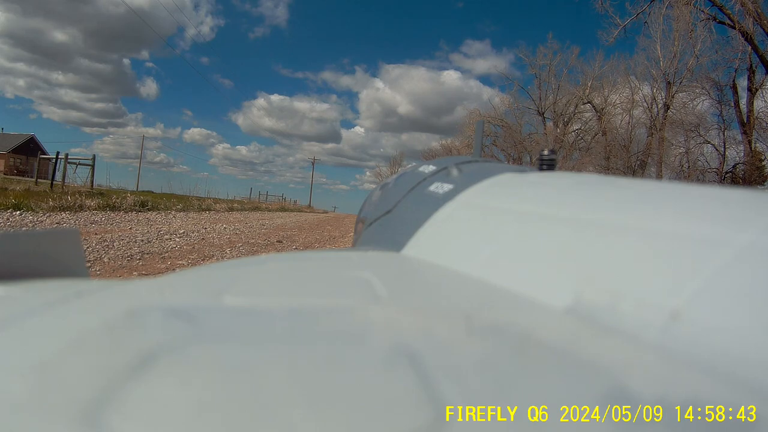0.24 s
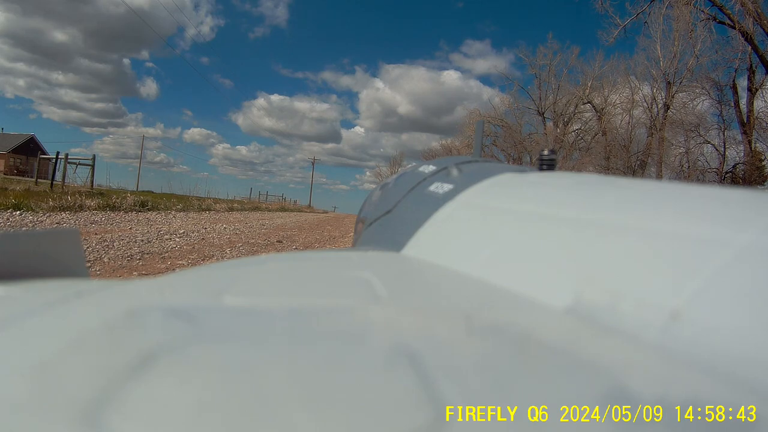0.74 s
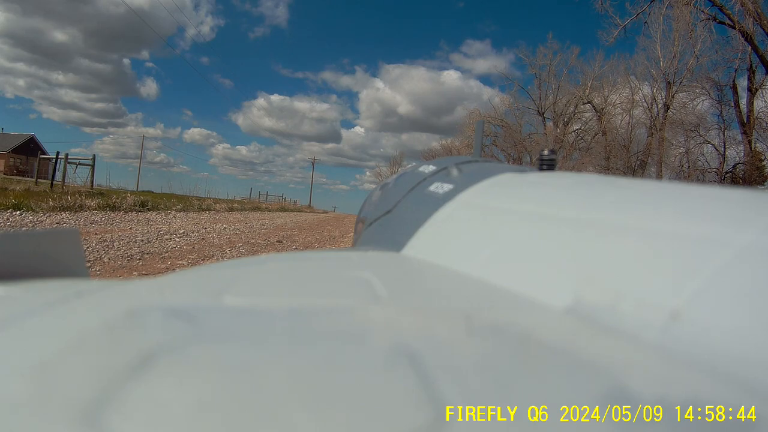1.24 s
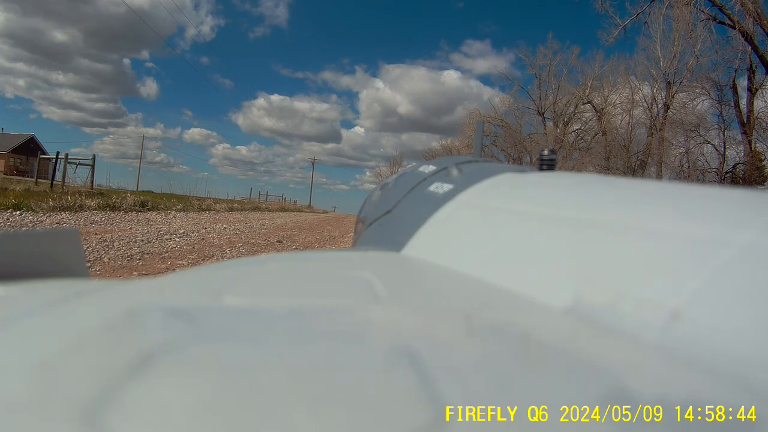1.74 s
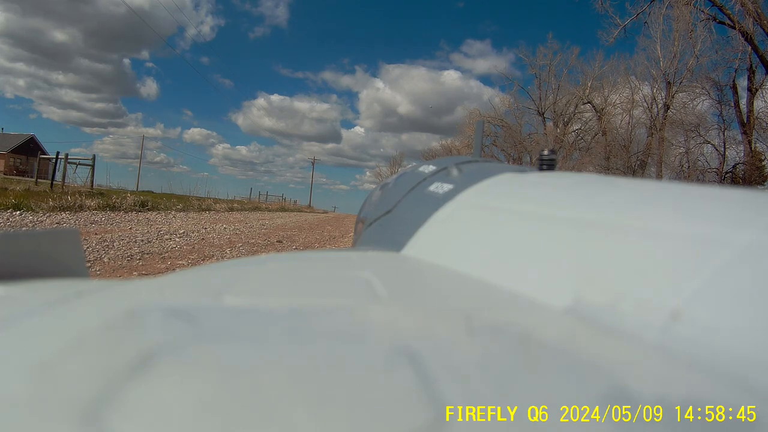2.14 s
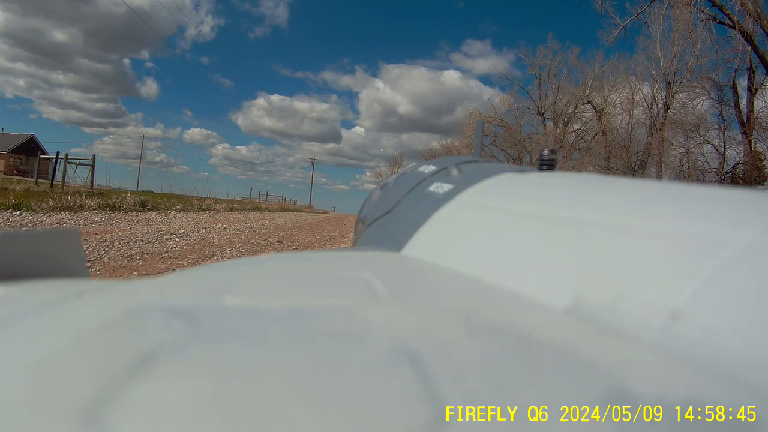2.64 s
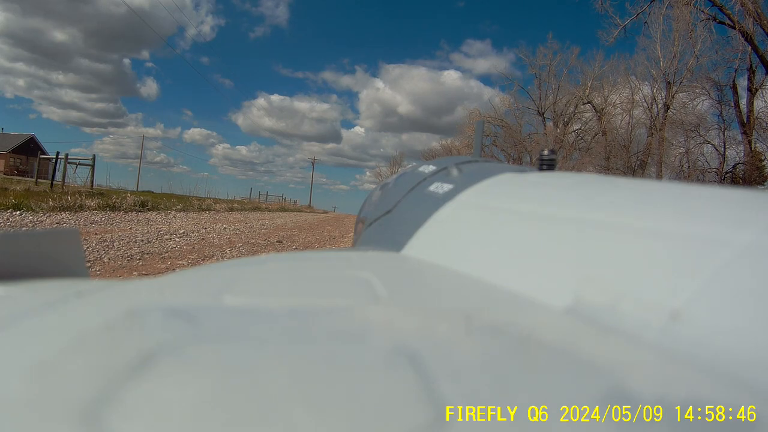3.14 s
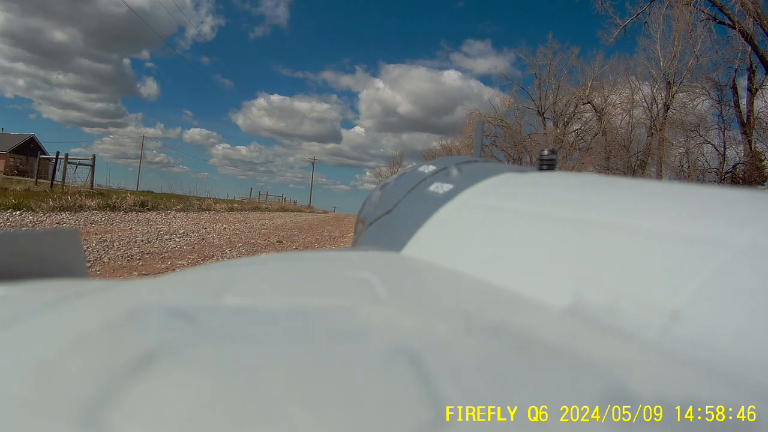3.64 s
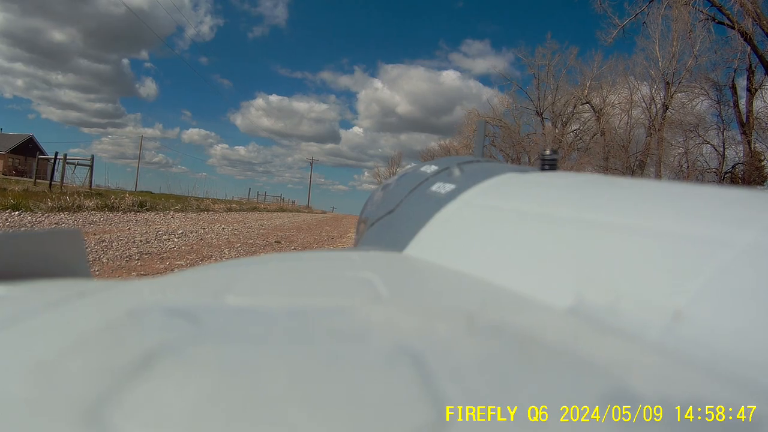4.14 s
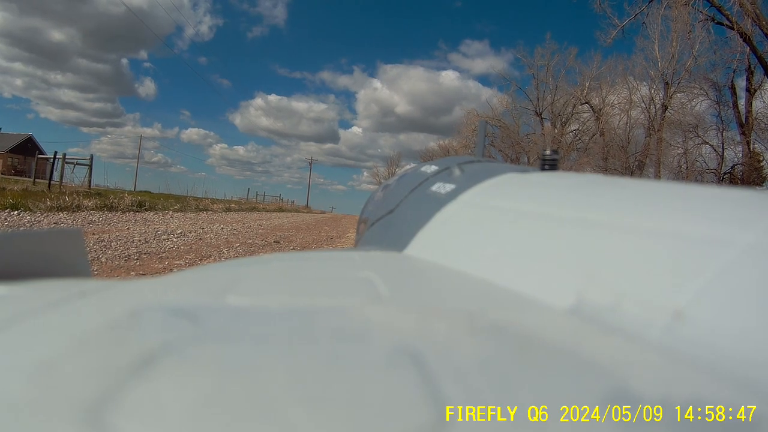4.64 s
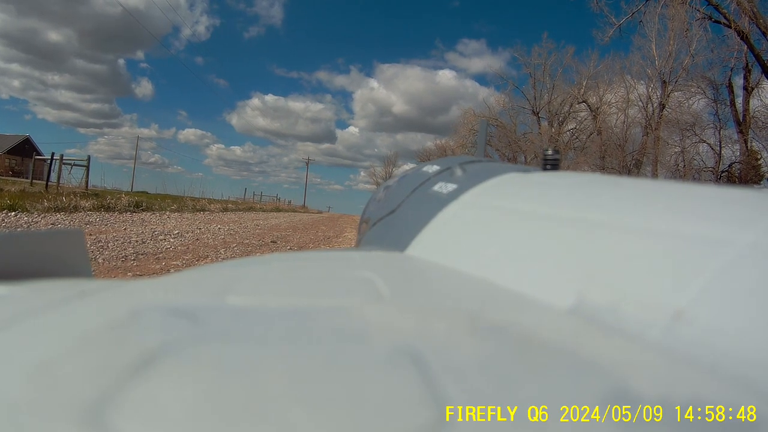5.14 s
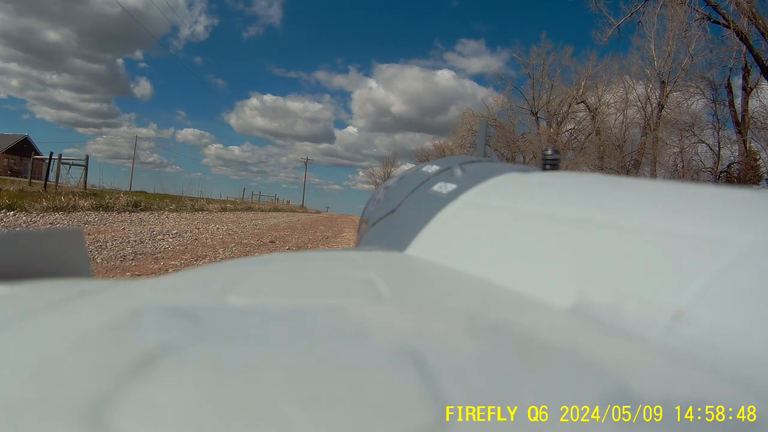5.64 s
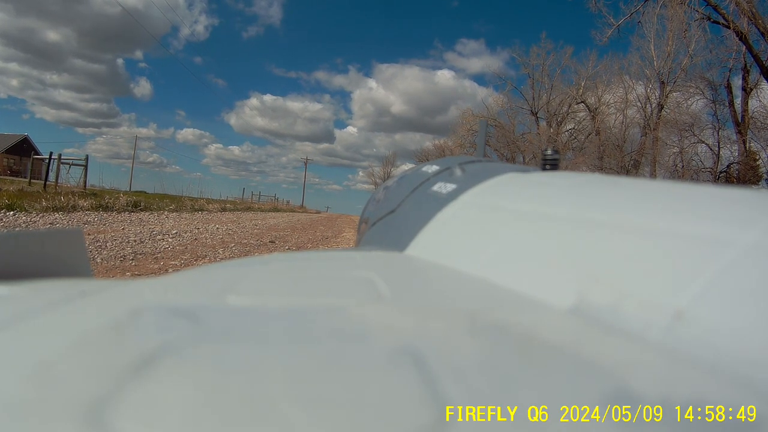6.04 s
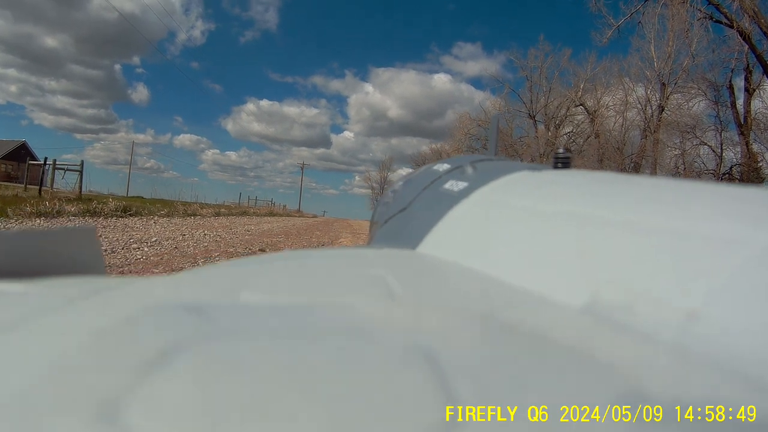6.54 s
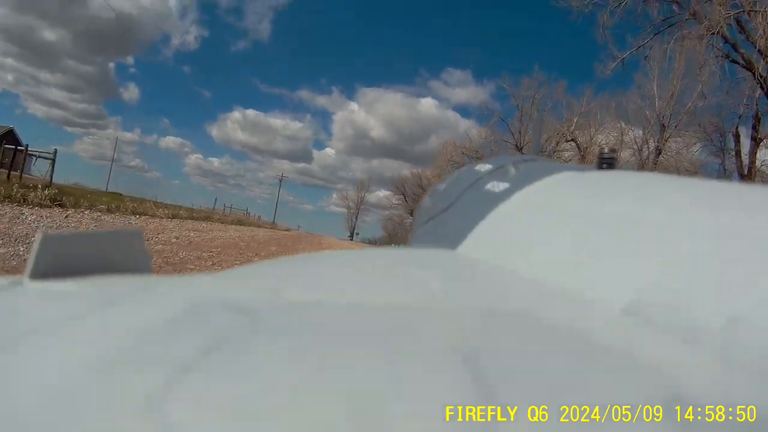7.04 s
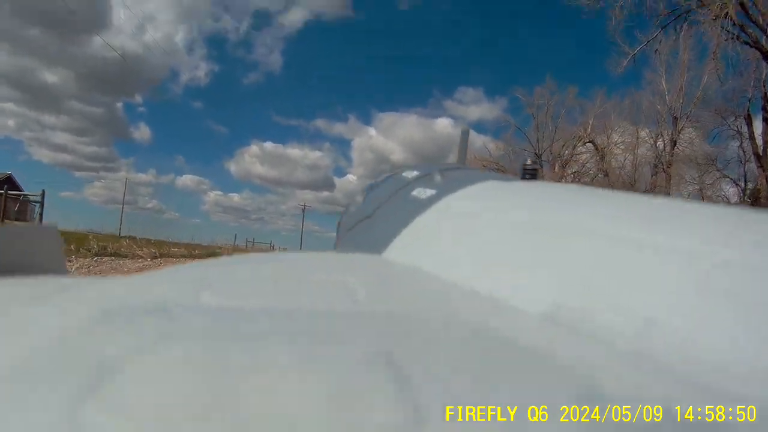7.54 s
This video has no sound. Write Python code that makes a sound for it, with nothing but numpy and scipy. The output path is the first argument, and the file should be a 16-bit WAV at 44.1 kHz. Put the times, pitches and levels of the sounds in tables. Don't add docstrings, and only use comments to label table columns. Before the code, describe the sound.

Distant birds chirp and trill, tiny gears twitch, and a model jet's electric fan jerks awake, idles, surges loudly, then rolls bumping across stones.

```python
import sys
import numpy as np
from scipy import signal
from scipy.fft import rfft, irfft, next_fast_len
from scipy.io import wavfile
from scipy.ndimage import uniform_filter1d, map_coordinates

SR = 44100
rng = np.random.default_rng(int(sys.argv[2]) if len(sys.argv) > 2 else 0)


def natural_amplitude(level_db):
    exponent = np.asarray(level_db, float) / 20
    return 10 ** exponent


def persist_wave(psi):
    counts = np.round(np.clip(psi, -1, 1) * 32767).astype(np.int16)
    wavfile.write(sys.argv[1], SR, np.atleast_2d(counts).T)


N = 343980
SPIN_S = 4.495


def unit(x):
    return x / np.sqrt(np.mean(x ** 2) + 1e-20)


def curves(rows):
    s, *cols = np.transpose(rows)
    return [np.interp(np.arange(N) / SR, s, c) for c in cols]


def law(points, hz):
    f, db = np.transpose(points)
    return np.interp(np.log(hz + 1), np.log(f + 1), db)


def after(s, rise=1e-4):
    return np.clip((np.arange(N) / SR - s) / rise, 0, 1)


def wobble(rate):
    knots = rng.standard_normal(int(N * rate / SR) + 4)
    return map_coordinates(knots, [np.arange(N) * rate / SR])


def filtered(x, response):
    m = next_fast_len(len(x) + 8192)
    return irfft(rfft(x, m) * response(np.fft.rfftfreq(m, 1 / SR)), m)[:len(x)]


def shape(points):
    f, db = np.transpose(points)
    return lambda hz: natural_amplitude(np.interp(np.log(hz + 1), np.log(f), db, left=-120, right=-120))


def modes(table):
    return lambda f: sum((-1) ** k * natural_amplitude(db) * 1j * f * w / (c * c - f * f + 1j * f * w)
                         for k, (c, w, db) in enumerate(table))


def peaks(table, hz):
    return sum(natural_amplitude(2 * db) / (1 + ((c * c - hz * hz) / (w * np.abs(hz) + 1)) ** 2)
               for c, w, db in table)


def add(track, s, sound):
    part = track[round(s * SR):][:len(sound)]
    part += sound[:len(part)]


def tone(hz):
    return np.sqrt(2) * np.sin(2 * np.pi * np.cumsum(hz) / SR) * (np.abs(hz) < 16000)


def patches(z, bins, frames):
    field = uniform_filter1d(rng.standard_normal(z.shape), size=bins, axis=0)
    return unit(uniform_filter1d(field, size=frames, axis=1))


def patchy(depth_db):
    z = signal.stft(rng.standard_normal(N), nperseg=512)[2]
    return signal.istft(z * natural_amplitude(depth_db * patches(z, 7, 8)), nperseg=512)[1][:N]


def airframe(hz):
    # resonance in Hz, width in Hz, lift in dB.
    body = [(650, 160, 7), (1000, 280, 4), (2000, 170, 12.5), (2650, 100, -20), (4000, 60, 13.5),
            (7700, 250, 2)]
    grid = np.arange(0, SR / 2, 10.)
    return np.interp(np.abs(hz), grid, np.sqrt(1 + peaks(body, grid)))


def shaft():
    # start in seconds, new shaft speed in Hz, stick travel in seconds, rotor lag in seconds.
    throttle = [
        (4.45, 217.7, .095, .187),
        (4.539, 279.9, .036, .05),
        (5.95, 321, .02, .128),
        (6.195, 345, .03, .02),
        (6.235, 675.3, .1, .028),
        (6.663, 470.5, .152, .031),
        (7.066, 520.3, .094, .031),
        (7.294, 503.5, .05, .15),
        (7.661, 156.5, .02, .212),
    ]
    t, speed, before = np.arange(N) / SR, np.zeros(N), 0
    for s, hz, travel, lag in throttle:
        def ramp(u):
            u = np.maximum(u, 0)
            return u - lag * (1 - np.exp(-u / lag))
        speed = speed + (hz - before) * (ramp(t - s) - ramp(t - s - travel)) / travel
        before = hz
    return speed


def turning(speed, load_db, flutter):
    # shaft speed in Hz, level in dB.
    unbalance = [(110, -53.5), (150, -46.5), (207, -37.5), (245, -27.5), (279, -36), (305, -27), (345, -31),
                 (430, -32), (490, -18.5), (520, -23), (674, -16.5)]
    # centre in Hz, width in Hz, level in dB.
    blades = [(2670, 180, -23), (3276, 156, -21), (3670, 100, -26), (4020, 156, -9.5), (5220, 240, -15.5),
              (6040, 600, -28.5), (7560, 470, -19), (8100, 300, -29)]
    # shaft speed in Hz, level in dB.
    commutation = [(66, -24), (150, -33), (180, -38), (227, -31), (250, -47), (270, -60), (320, -52),
                   (674, -66)]
    # multiple of shaft speed, level in dB.
    magnets = [
        [2.845, -49.5],
        [6, -34.5],
        [9, -39.5],
    ]
    out = natural_amplitude(law(unbalance, speed) + 1.82 * load_db) * flutter() ** after(6.65, 0.11) * tone(speed)

    blade_db = 10 * np.log10(peaks(blades, 12 * speed)) + 2.2 * load_db
    out += natural_amplitude(blade_db) * flutter() * tone(12 * speed)
    octave_lift_db = 7 * np.exp(-((24 * speed - 5550) / 450) ** 2)
    octave_db = np.minimum(blade_db - 14.0, -40) - speed / 120 + octave_lift_db
    out += natural_amplitude(octave_db) * flutter() * tone(24 * speed)

    step = 18 * speed
    buzz = sum(natural_amplitude(-9 * k - k * step / 300) * tone((k + 1) * step) * airframe((k + 1) * step)
               for k in range(4))
    out += natural_amplitude(law(commutation, speed) + 1.1 * load_db) * buzz

    drown_db = -np.maximum(speed - 330, 0) / 12 - np.maximum(160 - speed, 0) / 4
    out += sum(natural_amplitude(db + drown_db) * flutter() * airframe(k * speed) * tone(k * speed)
               for k, db in magnets)
    return out


def chopping(speed, fastest, flutter):
    chop_hz = 8007
    # shaft multiple added to the chopping rate, level in dB, near (1) or far (0).
    sidebands = [
        [0, -3, 1],
        [6, -3, 1],
        [-6, -4, 1],
        [12, -9, 1],
        [-12, -12, 1],
        [18, 0, 0],
    ]
    # fastest shaft speed so far in Hz, level in dB.
    near_law = [(3, -53), (55, -40.5), (125, -32), (180, -75), (235, -62), (280, -49), (302, -37),
                (346, -62.5), (500, -77)]
    # fastest shaft speed so far in Hz, level in dB.
    far_law = [(3, -60), (55, -57), (125, -50), (180, -60), (265, -51), (302, -49), (330, -52), (352, -62),
               (500, -79)]
    # fastest shaft speed so far in Hz, level in dB.
    falling_law = [(3, -50), (55, -33.5), (95, -59), (130, -43), (170, -60), (265, -34), (302, -54),
                   (318, -34), (338, -34), (352, -58), (500, -75)]
    step = 18 * speed
    near_db, far_db = law(near_law, fastest), law(far_law, fastest)

    def through_body(hz):
        return flutter() * airframe(hz) * tone(hz)

    out = sum(natural_amplitude(db + (near_db if near else far_db)) * through_body(chop_hz + k * speed)
              for k, db, near in sidebands)
    out += natural_amplitude(law(falling_law, fastest)) * through_body(chop_hz - step)

    beat = np.abs(2 * step - chop_hz)
    highest = np.where(speed < 222, 900, 2900)
    window = np.clip((beat - 350) / 200, 0, 1) * np.clip((highest - beat) / 300, 0, 1)
    window = window * (1 + np.clip((beat - 2100) / 150, 0, 2.5))
    out += natural_amplitude(-40) * window * through_body(beat)

    beat = 2 * chop_hz - 3 * step
    window = np.clip((2400 - beat) / 300, 0, 1) * (beat > 400)
    return out + natural_amplitude(-43) * window * through_body(beat)


def motor(speed, load_db):
    fastest = np.maximum.accumulate(speed)
    speed = speed * (1 + (.0012 + .005 * after(6.75)) * wobble(110))
    churn = wobble(70) + wobble(22)
    depth_db = 1.3 + 1.6 * after(6.3, .2)

    def flutter():
        return natural_amplitude(depth_db * np.roll(churn, rng.integers(N)))

    turned = after(SPIN_S, 0.022) * turning(speed, load_db, flutter)
    return turned + after(4.458, 0.0088) * chopping(speed, fastest, flutter)


def airflow(speed, load_db):
    # frequency in Hz, density in dB per Hz.
    roar_points = [(12, -79), (20, -41.5), (218, -19.5), (326, -6.5), (978, -10), (1690, -5), (3300, -12),
                   (6000, -19), (7800, -86), (13200, -120)]
    # frequency in Hz, density in dB per Hz.
    hiss_points = [(1760, -83), (3000, -5.5), (4060, -2.5), (6400, -7), (7600, -2), (9670, -8),
                   (11700, -14.5), (15600, -17)]
    # resonance in Hz, width in Hz, level in dB.
    duct_walls = [(569, 53, 2.5), (969, 95, 1.5), (1966, 215, 1.5), (2650, 280, 0.5)]
    # resonance in Hz, width in Hz, level in dB.
    fan_shroud = [(4140, 550, 0), (2650, 700, -2.5)]
    # shaft speed in Hz, level in dB.
    shroud_drive = [(60, -34.5), (147, -36), (215, -29.5), (280, -23), (315, -21.5), (600, -23), (674, -26)]
    idle_hz, gulp_t60, gulp_hiss_t60 = 280, 0.49, .14
    doublings = np.log2((speed + 1) / idle_hz)

    gulp = natural_amplitude(-60 * np.maximum(np.arange(N) / SR - SPIN_S, 0) / gulp_t60)
    roar_gain = np.hypot(natural_amplitude(-30 + 8 * doublings + 1.08 * load_db), natural_amplitude(-25) * gulp)
    hiss_gain = np.hypot(natural_amplitude(-37.5 + 9.5 * doublings + 1.54 * load_db),
                         natural_amplitude(-42) * gulp ** (gulp_t60 / gulp_hiss_t60))
    shroud_db = law(shroud_drive, speed) + 3 * np.minimum(load_db, 0)

    def ringing(body):
        return unit(filtered(rng.standard_normal(N), lambda hz: modes(body)(hz) ** 2))

    roar = unit(filtered(patchy(depth_db=1.27), shape(roar_points)))
    hiss = unit(filtered(patchy(depth_db=0.94), shape(hiss_points)))
    roar = roar + natural_amplitude(-3.5) * ringing(duct_walls)
    shroud = ringing(fan_shroud)
    out = roar_gain * natural_amplitude(4.0 + wobble(25)) * roar
    out += hiss_gain * natural_amplitude(7.0 + wobble(25)) * hiss
    out += natural_amplitude(shroud_db + 0.5 + wobble(25)) * shroud
    return after(SPIN_S, 0.016) * out


def wheels():
    # time in seconds, ground speed in dB.
    ground_speed = [(6.2, -18), (6.45, 1), (7.1, -7), (7.28, -1), (7.8, -1.5)]
    # frequency in Hz, density in dB per Hz.
    rumble_points = [(12, -42), (20, -24), (86, 4.5), (139, -1.5), (206, -11), (300, -1.5), (390, -9),
                     (660, -120)]
    # resonance in Hz, width in Hz, level in dB.
    gear = [(94, 32, -15.5), (293, 61, 0.5), (530, 120, -0.5), (880, 230, 3.5), (1283, 140, 4.5),
            (2500, 63, -6), (4230, 130, -18)]
    # start in seconds, thud peak in dB, length in seconds, crunch peak in dB.
    bumps = [(6.687, -4, 0.0057, 1), (6.786, -7.5, 0.0034, -19), (6.839, -7.5, 0.024, -20),
             (6.881, -4.5, 0.016, -13), (6.929, -8, 0.014, 0.5), (6.956, -21, 0.016, -3.5),
             (6.992, -13, 0.0098, 2), (7.011, -9.5, 0.018, -8), (7.027, -9, 0.0081, 0.5),
             (7.047, -10, 0.032, -35), (7.071, -3, 0.018, -3.5), (7.076, -14, 0.014, -2),
             (7.098, -32, 0.019, -20), (7.243, -11, 0.012, -24), (7.279, -5, 0.023, -4.5),
             (7.312, -26, 0.0053, -13), (7.332, -34, 0.011, -2), (7.397, -9.5, 0.037, -9),
             (7.424, -30, 0.0127, -6), (7.44, -21, 0.0041, 5.5), (7.453, -8, 0.021, -4),
             (7.478, -16, 0.0084, -21.5), (7.535, -3, 0.022, -0.5), (7.579, -33, 0.0157, -16),
             (7.663, -6, 0.017, 1.5), (7.724, -18, 0.019, -6), (7.777, -34, 0.021, -3)]
    rattle_db, shake_s = -24.5, 0.031
    rolling = after(6.2, 0.37) * natural_amplitude(curves(ground_speed)[0])
    rumble = unit(natural_amplitude(1.8 * wobble(23)) * filtered(rng.standard_normal(N), shape(rumble_points)))
    shake = natural_amplitude(-35) * rolling
    thud = natural_amplitude(rattle_db + 3.4 * wobble(40)) * rolling
    crunch = natural_amplitude(rattle_db - 7 + 2.5 * wobble(80)) * rolling

    t, slow = np.arange(SR // 10) / SR, np.arange(SR // 3) / SR
    for s, thud_db, length, crunch_db in bumps:
        swell = np.e * t / length * 2 * np.exp(-2 * t / length)
        add(thud, s - .002, natural_amplitude(thud_db - 13.5) * swell)
        add(crunch, s - .002, natural_amplitude(crunch_db - 13.5) * swell ** 2)
        slow_swell = np.e * slow / shake_s * 2 * np.exp(-2 * slow / shake_s)
        add(shake, s - .01, natural_amplitude(thud_db - 20.5) * slow_swell)

    def struts(hz):
        return (modes(gear)(hz) + 0.29) / (1 + 1j * hz / 800) ** 2

    def tyres(hz):
        body = modes([(1150, 700, 0), (1900, 900, -2), (2700, 900, -5)])
        return body(hz) / (1 + 1j * hz / 3500) ** 2

    out = shake * rumble
    for force, path in ((thud, struts), (crunch, tyres)):
        grains = rng.standard_normal(N) * natural_amplitude(2.5 * rng.exponential(size=N))
        out += filtered(grains * force, path) / np.std(filtered(grains, path))
    return out


def knocks():
    # start in seconds, peak in dB, ring in Hz.
    stones = [(6.6889, -9, 603.0), (6.8519, -10, 1206.0), (6.8846, -2, 441.0), (6.8889, -15, 398.0),
              (6.8942, -8.9, 603.0), (6.9356, -4, 937.0), (6.961, -4, 1453.0), (6.9763, -8.7, 937.0),
              (6.9962, 0, 1141.0), (7.0169, -4, 904.0), (7.023, -8, 1497.0), (7.0271, 1, 1206.0),
              (7.0317, -8, 1540.0), (7.0372, -9.4, 377.0), (7.0443, -6.5, 452.0), (7.0486, -7, 510),
              (7.0721, -4.9, 1206.0), (7.0789, 6, 926.0), (7.0867, -10, 764.0), (7.0963, -6.5, 904.0),
              (7.2445, -9.8, 1820), (7.28, -5, 1217.0), (7.2844, -12, 1281.0), (7.2895, -2.8, 467),
              (7.3031, -9, 592.0), (7.316, -9.0, 861.0), (7.3206, -6, 1766.0), (7.3379, 0, 1626.0),
              (7.3997, -7, 585), (7.4138, -9.1, 538.0), (7.4254, -10, 1518.0), (7.4312, -10, 506.0),
              (7.441, -2, 1744.0), (7.4604, -1, 1109.0), (7.4644, -9.9, 786.0), (7.4687, -1, 883.0),
              (7.4733, -8.8, 1174.0), (7.4847, -2, 1206.0), (7.5371, -5, 484.0), (7.5438, -2.3, 415),
              (7.5529, 3, 560), (7.5584, -8.0, 754.0), (7.5628, -12, 1077.0), (7.5676, -10, 409.0),
              (7.5838, -4, 1884.0), (7.5885, -8.4, 549.0), (7.6653, -4, 926.0), (7.6722, -9, 894.0),
              (7.6771, 6, 1152.0), (7.6863, -8, 538.0), (7.7331, -11, 586), (7.7394, -4, 592.0),
              (7.7815, -7, 2067.0)]
    cycles = 4.5
    out, t = np.zeros(N), np.arange(SR // 25) / SR
    for s, db, hz in stones:
        ring = np.sin(2 * np.pi * hz * t) * natural_amplitude(-60 * t * hz / cycles)
        ring += 0.42 * np.sin(2 * np.pi * 1.8 * hz * t) * natural_amplitude(-140 * t * hz / cycles)
        add(out, s, natural_amplitude(db + 3.5) * ring * (1 - np.exp(-t / .0003)))
    return out


def kicks():
    # start in seconds, peak in dB.
    jerks = [(4.211, -41), (4.262, -49), (4.461, -20.5), (4.474, -19.5), (4.49, -19.5), (4.496, -11),
             (4.5, -11), (4.505, -12), (4.514, -1), (4.526, -2.5), (4.535, 3)]
    # shell mode in Hz, level in dB, fade of 60 dB in seconds.
    shell = [(610, 12, 0.034), (947, -0.5, 0.065), (1168, 5.5, 0.029), (1987, 0.5, 0.042), (2500, -8, .02),
             (4000, -15, 0.018), (324, -4.5, 0.038), (111, -16, 0.025), (46.4, -25, 0.123)]
    out, t = np.zeros(N), np.arange(SR // 10) / SR
    for s, db in jerks:
        ring = np.zeros(len(t))
        for hz, level, t60 in shell:
            decay = natural_amplitude(level + rng.normal(0, 2) - 60 * t / t60)
            ring += decay * np.sin(2 * np.pi * hz * rng.uniform(.96, 1.04) * t)
        crack = natural_amplitude(db - 30 - 60 * t / 0.024) * rng.standard_normal(len(t))
        add(out, s, natural_amplitude(db - 8.5) * ring * (1 - np.exp(-t / 0.0013)) + crack)
    hatch = natural_amplitude(-18 - 60 * t / 0.18) * np.sin(2 * np.pi * 680 * t)
    add(out, 4.594, hatch * np.sin(np.pi * t / t[-1]) ** 0.21)
    return out


def servos():
    # start in seconds, length in seconds, gear teeth in Hz, level in dB, noise share 0-1.
    twitches = [
        (4.123, 0.068, 900, -66, 0.86),
        (4.161, 0.037, 1357, -48.5, 0.68),
        (4.195, .022, 1035, -49, 0.7),
        (4.222, 0.085, 700, -67, 1),
        (4.306, 0.033, 584, -50, 0.6),
        (4.32, 0.024, 510.8, -43, 0.4),
        (4.365, .026, 793, -36.5, 0.87),
        (4.39, 0.0193, 820, -42.5, .8),
        (4.408, 0.05, 780, -45.5, .8),
        (4.448, 0.044, 785, -40, 0.7),
    ]
    out = np.zeros(N)
    for s, length, hz, db, share in twitches:
        bright_db = -6 - (hz - 700) / 60 + (db + 66) / 4
        u = np.arange(int(length * SR)) / (length * SR)
        turned = np.cumsum(hz * (1 - .5 * (u - .5) ** 2)) / SR
        teeth = np.diff(np.floor(turned), prepend=0)
        mix = (1 - share) * unit(teeth) + share * rng.standard_normal(len(u))
        drive = np.pad(np.sin(np.pi * u) ** .5 * mix, (0, 900))
        case = modes([(4000, 370, 12.5), (7880, 1600, bright_db), (2800, 410, 0), (836, 400, 1.0),
                      (5750, 1600, -6.0), (410, 280, -1.5), (110, 38, -3)])
        heard = filtered(drive, lambda f: case(f) / (1 + 1j * f / 11000) ** 2 + natural_amplitude(-33))
        add(out, s, natural_amplitude(db) * unit(heard))
    t = np.arange(SR // 10) / SR
    linger = rng.standard_normal(len(t)) * natural_amplitude(-60 * t / 0.15)
    return out + natural_amplitude(-12.5) * signal.fftconvolve(out, linger / np.linalg.norm(linger))[:N]


def whistle(length, start_hz, middle_hz, end_hz):
    u = np.arange(int(length * SR)) / (length * SR)
    hz = np.polyval(np.polyfit([0, .5, 1], [start_hz, middle_hz, end_hz], deg=2), u)
    waver = natural_amplitude(2.5 * np.interp(u, np.linspace(0, 1, num=8), rng.standard_normal(size=8)))
    return waver * np.sin(np.pi * u) ** 0.152 * (tone(hz) + natural_amplitude(-28) * tone(2 * hz))


def birds():
    # start in seconds, length in seconds, start pitch in Hz, end pitch in Hz, level in dB.
    notes_sung = [(.045, .085, 4400, 3150, -84), (1.21, .04, 3010, 3120, -81.5),
                  (1.545, .084, 3310, 3416, -83.5), (1.62, .034, 2410, 2976, -80),
                  (1.654, 0.041, 2970, 2100, -77), (2.098, 0.059, 1155, 1500, -70.5),
                  (2.165, 0.019, 4500, 4300, -71), (2.183, .032, 4000, 2950, -72),
                  (2.224, 0.054, 3060, 2550, -70), (2.29, 0.023, 2660, 2820, -64),
                  (2.32, .017, 2740, 1500, -69.5), (2.441, .075, 1900, 1790, -69),
                  (2.442, 0.093, 2190, 2000, -72), (2.495, .056, 4300, 3000, -82),
                  (2.555, 0.0148, 3010, 3280, -59), (2.573, .005, 5000, 3900, -67.5),
                  (2.576, .012, 2910, 2950, -62), (2.588, 0.019, 3050, 2310, -62),
                  (3.011, .019, 2650, 4420, -67), (3.033, 0.013, 4540, 4900, -56.5),
                  (3.055, 0.031, 2800, 1800, -62.5), (3.088, 0.035, 1837, 1714, -59),
                  (3.126, .08, 1754, 1760, -76), (3.467, 0.13, 3320, 2796, -83)]
    # start in seconds, level of the lower note in dB.
    trill = [(2.648, -54), (2.677, -59), (2.7028, -55), (2.728, -53), (2.759, -51), (2.7911, -53),
             (2.822, -52.5), (2.851, -49), (2.8862, -50), (2.922, -55), (2.953, -54), (2.9907, -51)]
    # start in seconds, level in dB, lower voice in Hz.
    calls = [
        (3.584, -57.5, 3500),
        (3.755, -57.5, 3400),
    ]
    # start in seconds, peak in dB.
    chucks = [
        (0.01, -51.5),
        (0.1424, -51.5),
        (0.3147, -53),
    ]
    # frequency in Hz, density in dB per Hz.
    chuck_points = [(1200, -22), (1750, 0), (2200, -12), (3000, 0), (3800, -15), (4600, -10), (6000, -25)]
    out = np.zeros(N)
    for s, length, start_hz, end_hz, db in notes_sung:
        middle_hz = min(start_hz, end_hz) + .4 * abs(end_hz - start_hz)
        add(out, s, natural_amplitude(db) * whistle(length, start_hz, middle_hz, end_hz))

    for s, db in trill:
        since = s - trill[0][0]
        hz = 2660 - 580 * since + rng.normal(0, 60)
        upper_db = -65.5 + 32 * since + rng.normal(0, 2.8)
        bend = rng.uniform(.94, 1.02, size=3)
        add(out, s - .011, natural_amplitude(upper_db - 8) * whistle(0.015, *(bend * [3440, 3220, 2800])))
        add(out, s - .002, natural_amplitude(db - 7.5) * whistle(0.012, hz + 60, hz, hz - 30))

    for s, db, low_hz in calls:
        add(out, s, natural_amplitude(db - 8.5) * whistle(0.0076, 3700, 4800, 6800))
        add(out, s + .007, natural_amplitude(db) * whistle(0.041, 3920, 4400, 4520))
        add(out, s + 0.015, natural_amplitude(db - 7) * whistle(0.037, .92 * low_hz, low_hz + 100, low_hz + 300))
        add(out, s + .041, natural_amplitude(db + 1) * whistle(.008, 4900, 4600, 3800))
        add(out, s + .047, natural_amplitude(db - 3) * whistle(0.012, 3460, 2200, 1680))
        add(out, s + .058, natural_amplitude(db - 10) * whistle(.022, 2900, 2100, 1500))

    t = np.arange(SR // 10) / SR
    for s, db in chucks:
        puff = unit(filtered(rng.standard_normal(len(t)), shape(chuck_points)))
        add(out, s, natural_amplitude(db - 2.5 - 60 * t / 0.065) * (1 - np.exp(-t / 0.005)) * puff)
    t = np.arange(SR // 2) / SR
    trees = rng.standard_normal(len(t)) * natural_amplitude(-60 * t / 0.27) * (t > .004)
    return out + natural_amplitude(-2) * signal.fftconvolve(out, trees / np.linalg.norm(trees))[:N]


def breeze():
    # (negative: to rise 20 dB, then a faster
    gusts = [
        (.8, -65.5, 0.1),
        (1.42, -77, 3.5),
        (1.76, -74.5, 1.5),
        (2.76, -69, 1),
        (3.3, -71, -0.5),
        (3.87, -64, 1.5),
        (4.2, -49.5, 0.12),
    ]
    # frequency in Hz, density in dB per Hz.
    leaves = [(20, -9), (150, 0.5), (800, -8.5), (2200, -15.5), (3500, -17), (6000, -58.5)]
    t = np.arange(N) / SR
    rise = 0.52
    swells = sum(natural_amplitude(db - 20 * np.maximum((t - s) / fall, (s - t) / (rise * fall)))
                 for s, db, fall in gusts)
    rustle = unit(filtered(rng.standard_normal(N), shape(leaves)))
    return (natural_amplitude(-94) + natural_amplitude(-4) * swells) * rustle


def background():
    # frequency in Hz, density in dB per Hz.
    floor = [(12, -28), (20, 0.5), (428, -8.5), (768, -14), (2150, -22.5), (3090, -25.5), (4320, -27.5),
             (15600, -30)]
    return natural_amplitude(-67.0 + 0.72 * wobble(7.2)) * unit(filtered(rng.standard_normal(N), shape(floor)))


def scene():
    # time in seconds, load in dB.
    load = [(4.5, 0), (5.9, 0.5), (6.2, 1), (6.33, 1.5), (6.45, -0.5), (6.66, -1.4), (6.8, -3.5),
            (7.1, -3.5), (7.3, -1.5), (7.55, -4), (7.8, -4.5)]
    drive = shaft(), curves(load)[0]
    jet = motor(*drive) + airflow(*drive) + wheels() + knocks() + kicks() + servos()
    mono = jet + birds() + breeze() + background()
    return np.array([mono, mono])


def roll_off(x):
    return signal.sosfilt(signal.butter(12, 15710, fs=SR, output="sos"), x)


def record(dry):
    # frequency in Hz, rarity of a blank in standard deviations.
    blanks = [(3000, 3), (4600, 2.4), (6300, 1.8), (7500, 2.3), (8800, 1.8), (10200, 1.3), (11800, .7),
              (13000, 1.1), (15000, .5)]
    top, hard = .75, 4
    rounded = dry[0] / (1 + np.abs(dry[0] / top) ** hard) ** (1 / hard)
    hz, _, z = signal.stft(rounded, SR, nperseg=1024)
    loud = np.linalg.norm(z, axis=0) > natural_amplitude(-48)
    blank = (patches(z, 7, 5) > law(blanks, hz)[:, None]) & loud
    mono = signal.istft(z * np.where(blank, natural_amplitude(-30), 1), nperseg=1024)[1][:N]
    stray = (patches(z, 12, 3) > 2.1) & (hz[:, None] > 4300) & ~blank
    side = signal.istft(1j * z * stray * natural_amplitude(-10), nperseg=1024)[1][:N]
    mix = np.array([mono + side, mono - side])
    return roll_off(mix)


dry = scene()
out = record(dry)
persist_wave(out)
```